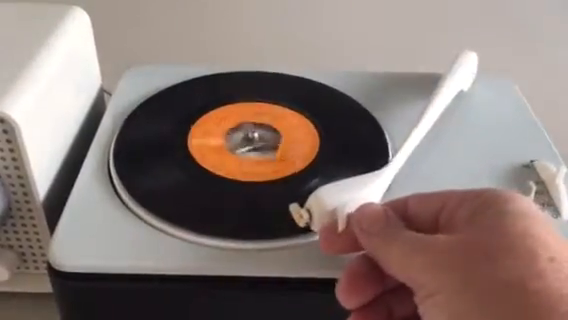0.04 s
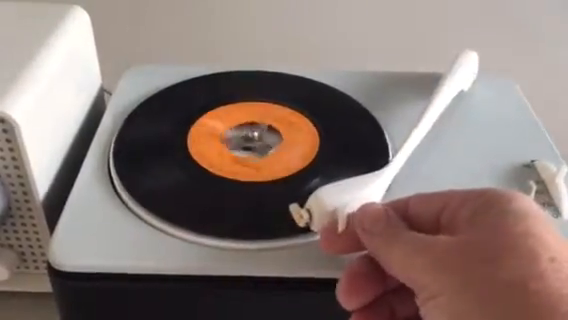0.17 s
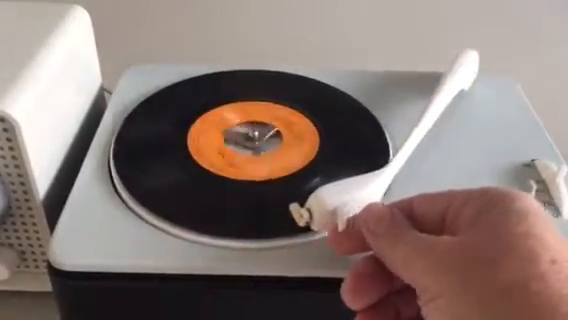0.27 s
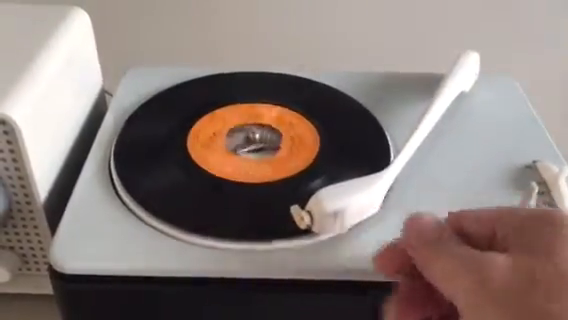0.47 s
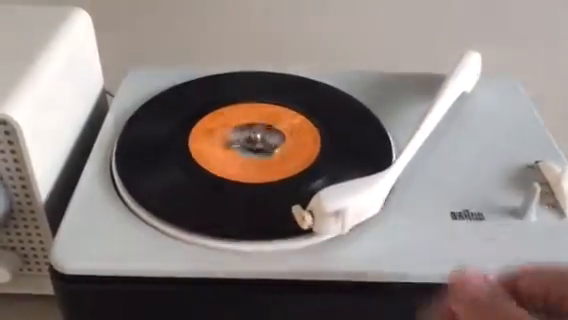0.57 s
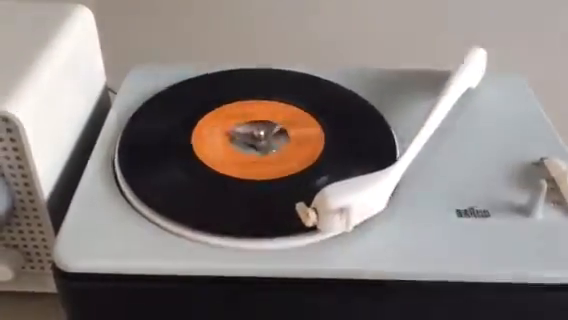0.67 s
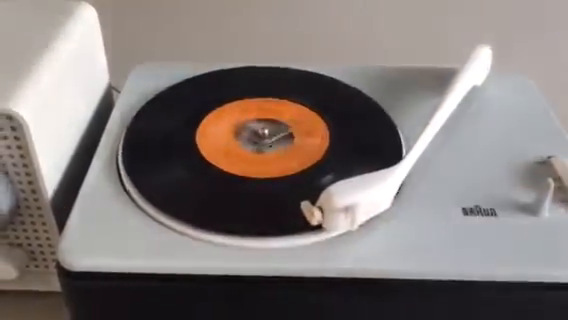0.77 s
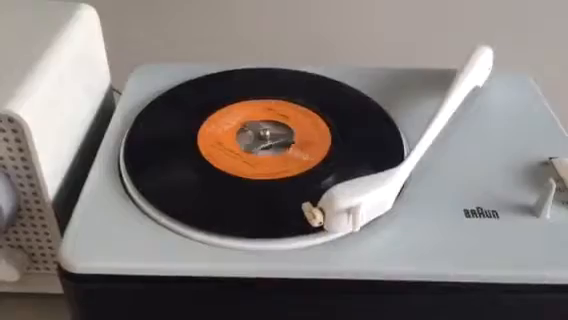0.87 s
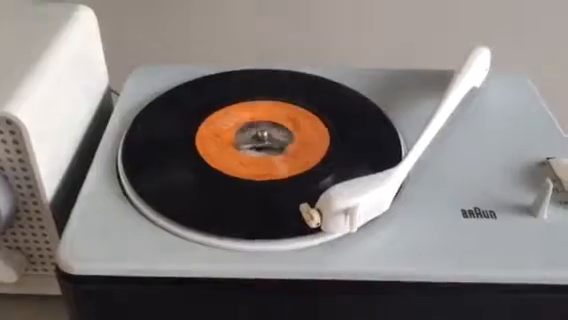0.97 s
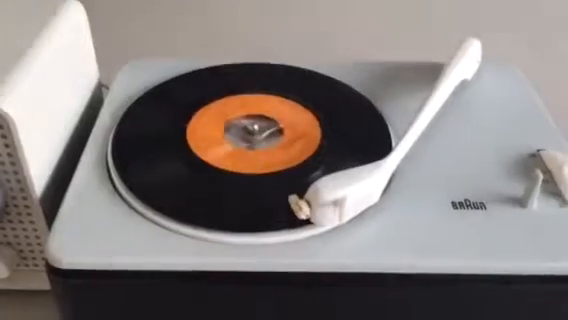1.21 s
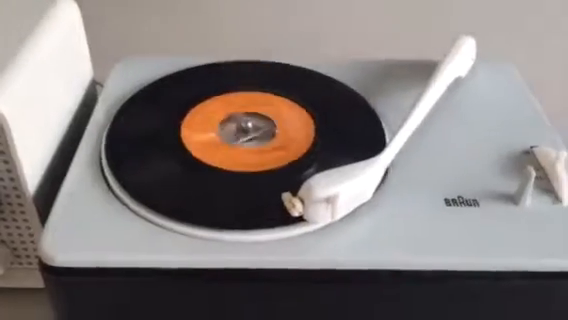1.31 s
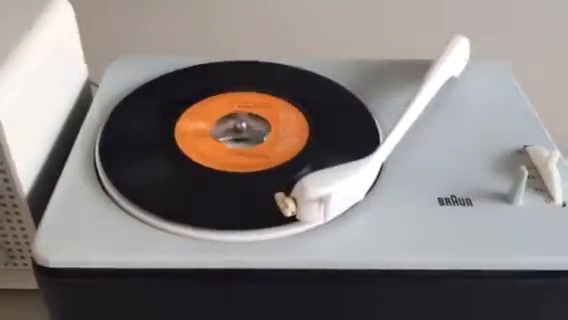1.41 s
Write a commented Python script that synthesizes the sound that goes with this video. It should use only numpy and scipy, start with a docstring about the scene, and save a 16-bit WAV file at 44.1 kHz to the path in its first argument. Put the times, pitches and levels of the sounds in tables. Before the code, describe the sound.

A stylus drops onto a record with a low thump, after light bumps and ticks from fingers lowering the arm. A sharp click follows, then faint crackle over low rumble, all from the player's small loudspeaker in a slightly echoing room.

```python
"""A stylus lands on a spinning single with a thump, then reads one sharp click and the crackle of
dust in the lead-in groove. Before it lands, the fingers lowering the tonearm rub and bump it, and
the arm conducts these vibrations to the pickup. The record player's small loudspeaker colours the
thump, clicks, crackle, bumps and rubbing; a low groove rumble sounds alongside them in a live room,
over faint noise and hum."""
import sys
import numpy as np
from scipy import signal
from scipy.fft import rfft, irfft
from scipy.io import wavfile

SR = 44100
rng = np.random.default_rng(int(sys.argv[2]) if len(sys.argv) > 2 else 0)


def output_pcm(signal):
    """Save a mono or channel-first signal as 16-bit PCM at the path in sys.argv[1].

    Samples are clipped to [-1, 1] before scaling.
    """
    pcm = np.clip(np.atleast_2d(signal).T, -1, 1) * 32767
    wavfile.write(sys.argv[1], SR, np.round(pcm).astype(np.int16))


N = 63945
TIME = np.arange(N) / SR
LANDING_S = .5073


def landing(click):
    """Impact excitation: the stylus gives a sudden, slowly relaxing push that rings a mode of the deck."""
    push = low_pass(click, hz=130, order=1)
    thump = low_pass(push, hz=2200, order=3)
    deck = resonance(thump, hz=139.8, db=8, t60=0.41)
    return place(thump + deck, LANDING_S, db=-14.5)


def groove(click):
    """Shot noise: each speck of dust deflects the stylus with one impulse, over continuous rumble."""
    # single specks: (time [s], peak level [dB], contact low-pass corner [Hz])
    specks = [(0.5098, -36.5, 5800), (0.5380, -43, 6900), (0.5469, -34.5, 6550), (0.5952, -14.5, 4300),
              (0.6543, -51, 6000), (0.674, -49, 5000), (0.7064, -44, 6100), (0.7142, -36.5, 6040),
              (0.747, -38.5, 2980), (0.771, -45.5, 3030), (.8060, -44.5, 5400), (0.9063, -51, 6030),
              (0.9127, -43.5, 5900), (0.9420, -48, 5240), (.9596, -36, 5600), (0.9597, -46, 463),
              (1.0198, -39.5, 7500), (1.052, -43.5, 5040), (1.0734, -42, 5500), (1.128, -48.5, 6100),
              (1.1448, -44.5, 6500), (1.1930, -37, 1530), (1.2123, -45, 2540), (1.2172, -46.5, 990),
              (1.2909, -53, 6940), (1.4104, -42, 7260), (1.4323, -46.5, 8200)]
    # dirty stretches of groove, Gaussian in time: (centre time [s], half-width [s], rms level [dB])
    dirty_stretches = [(0.552, 0.028, -65.5), (0.717, 0.0053, -62), (0.778, 0.063, -71), (0.911, 0.01, -64),
                       (1.03, 0.017, -67.5), (1.14, 0.014, -68), (1.217, 0.021, -70.5),
                       (1.422, 0.017, -65.5)]
    # rumble spectrum: (frequency [Hz], relative spectral level [dB])
    rumble_spectrum = [(90, -54), (140, 11.5), (230, -16), (320, 1.5), (500, -35), (1300, -42), (1800, -31),
                       (2700, -20.5), (6000, -40)]
    pops = sum(place(-high_pass(low_pass(click, corner), hz=217), s, db) for s, db, corner in specks)
    dirt = sum(from_db(db) * np.exp(-((TIME - s) / half_s) ** 2) for s, half_s, db in dirty_stretches)
    grit = through(grains(per_s=990, spread_db=0), click)
    scratches = dirt * rms_one(high_pass(grit, hz=4470, order=1))
    crackle = from_db(-77.5) * rms_one(through(grains(per_s=270, spread_db=5), click))
    rumble = from_db(-68.5) * noise(rumble_spectrum)
    return pops + scratches + (crackle + rumble) * (TIME > LANDING_S)


def handling(click):
    """Structure-borne sound: the arm carries finger impacts and friction to the pickup, losing treble."""
    # soft bumps of the hand: (time [s], peak level [dB], lower band edge [Hz], upper band edge [Hz])
    hand_bumps = [(0.1961, -35.5, 237, 574), (0.2241, -36, 126, 333), (0.239, -38, 119, 260),
                  (0.2459, -34, 114, 565), (0.261, -46, 132, 330), (.3160, -35, 467, 930),
                  (0.4190, -32.5, 314, 497), (0.421, -38.5, 760, 1230)]
    # dry ticks of the fingers: (time [s], peak level [dB])
    finger_ticks = [(0.173, -40.5), (0.1917, -32.5), (0.2314, -39), (.2575, -55), (0.2631, -38.5),
                    (0.3336, -37), (0.388, -35.5), (0.3983, -43.5), (0.442, -47), (0.453, -36),
                    (0.4564, -37.5), (0.489, -43), (0.4915, -32.5), (0.505, -25)]
    # envelope of the fingers' friction: (time [s], level [dB])
    rub_levels = [(.14, -91), (.185, -47.5), (.215, -57), (.26, -56), (.30, -63.5), (.345, -55),
                  (.375, -65.5), (.455, -54), (.478, -60.5), (.50, -53.5), (.52, -64)]
    bumps = sum(place(high_pass(low_pass(click, high, order=3), low, order=3), s, db)
                for s, db, low, high in hand_bumps)
    arm = low_pass(click, hz=3840, order=8) + from_db(-18) * click  # a little treble leaks through
    tick = low_pass(arm, hz=5800, order=1)
    ticks = sum(place(tick, s, db) for s, db in finger_ticks)
    slip = low_pass(arm, hz=3320, order=1)
    rub = rms_one(through(grains(per_s=1700, spread_db=8.5), slip))
    rub_envelope = from_db(np.interp(TIME, *np.transpose(rub_levels))) * (TIME < rub_levels[-1][0])
    return bumps + ticks + rub * rub_envelope


def speaker_click(size=16384):
    """The loudspeaker's impulse response: a minimum-phase pulse with modal ringing and dispersion."""
    # magnitude response: (frequency [Hz], gain [dB])
    response = [(70, -42), (105, -36.5), (145, -10.5), (250, -9.5), (390, -10.5), (470, -7.5), (820, -4.5),
                (1000, 0), (1180, -3.5), (1400, 4), (1510, -18), (1950, -13), (2250, -0.5), (3000, 3.5),
                (3300, -3.5), (4200, -3.5), (4480, -18.5), (4750, -8), (5150, -19), (5650, -7.5),
                (6150, -11), (7200, -9), (8250, -13), (8700, -20), (9900, -32), (15500, -31.5)]
    # cabinet and cone modes: (frequency [Hz], gain over the direct sound [dB], decay time T60 [s])
    modes = [(164, 0, 0.066), (276.6, -3.5, 0.1), (341.5, -6, 0.19), (467.5, 7.5, 0.13), (594, 1.5, 0.22),
             (926, -9.5, 0.17), (1029, -1, 0.1), (1274, -5, 0.14), (2390, 6, 0.22), (2590, -8, 0.67)]
    # registers that answer late: (frequency [Hz], added group delay [s])
    lags = [(330, 0.0021), (900, 0.00028), (2700, 0.00021), (5800, 0.00024), (7800, 0.0022)]
    gain = from_db(at_hz(response, np.arange(size // 2 + 1) * SR / size))
    cepstrum = irfft(np.log(gain))
    cepstrum[1:size // 2] *= 2  # folding onto positive time gives minimum phase
    cepstrum[size // 2 + 1:] = 0
    direct = irfft(np.exp(rfft(cepstrum)))
    click = direct + sum(resonance(direct, hz, db, t60) for hz, db, t60 in modes)
    for hz, lag_s in lags:
        allpass = poles(hz, np.exp(-2 / (lag_s * SR)))
        click = signal.lfilter(allpass[::-1], allpass, click)
    return click


def room(x):
    """Reverberation: early reflections and a diffuse tail, decaying band by band, join the direct sound."""
    # reflections from nearby surfaces: (delay [s], level [dB])
    reflections = [(.0018, -22.5), (.0032, -18.5), (.0093, -14)]
    # diffuse tail: (frequency [Hz], level [dB], reverberation time T60 [s])
    reverberation = [(144, -12.5, 0.38), (415, -8, 0.63), (600, -9.5, 1.02), (1190, -14.5, 1.1),
                     (1790, 1.5, 0.51), (2650, -17, 1.5), (6860, -7, 0.33), (9400, -4.5, 0.12),
                     (14200, -8, 0.29)]
    white = rfft(rng.standard_normal(2 * N))
    hz = np.arange(N + 1) * SR / (2 * N)
    edges_hz = np.geomspace(60, 16000, 17)
    tail = np.zeros(N)
    for low, high in zip(edges_hz, edges_hz[1:]):
        centre = np.sqrt(low * high)
        decay_rate = np.log(1000) / at_hz(reverberation, centre, column=2)
        band = irfft(white * (hz >= low) * (hz < high))[:N]
        decay = np.sqrt(2 * decay_rate / SR) * np.exp(-decay_rate * TIME)  # unit energy
        tail += band * from_db(at_hz(reverberation, centre)) * decay
    tail *= np.minimum(TIME / 0.0011, 1) ** 2  # builds up in 1.1 ms
    echoes = sum(from_db(db) * np.pad(x, (int(s * SR), 0))[:N] for s, db in reflections)
    return x + low_pass(echoes, hz=2870) + through(x, tail)


def background():
    """The noise floor: broadband room noise and a faint pure tone of mains hum."""
    # mains hum: (frequency [Hz], rms level [dB])
    hum_tones = [(200, -74.5)]
    # room noise spectrum: (frequency [Hz], relative spectral level [dB])
    room_spectrum = [(20, -57), (31, -8), (52, 3), (90, -4.5), (300, -8.5), (600, -12), (1150, -10.5),
                     (1900, -19), (2600, -23), (15500, -36)]
    hum = sum(from_db(db) * np.sqrt(2) * np.sin(2 * np.pi * (hz * TIME + rng.random()))
              for hz, db in hum_tones)
    return hum + from_db(-66) * noise(room_spectrum)


def grains(per_s, spread_db):
    """A Poisson train of impulses of random sign, their levels scattered upward by spread_db."""
    sizes = from_db(spread_db * np.minimum(rng.exponential(1, N), 3))
    return sizes * rng.choice([-1, 1], N) * (rng.random(N) < per_s / SR)


def noise(spectrum):
    """Spectral shaping: white noise takes on the given colour, at rms 1."""
    hz = np.arange(N + 1) * SR / (2 * N)
    white = rfft(rng.standard_normal(2 * N))
    return rms_one(irfft(white * from_db(at_hz(spectrum, hz)))[:N])


def resonance(x, hz, db, t60):
    """Forced vibration of one damped mode, with gain db at its peak."""
    r = np.exp(-np.log(1000) / (t60 * SR))
    return from_db(db) * signal.lfilter([1 - r, 0, r - 1], poles(hz, r), x)


def poles(hz, r):
    """Feedback coefficients of a damped oscillator with pole radius r."""
    return [1, -2 * r * np.cos(2 * np.pi * hz / SR), r * r]


def low_pass(x, hz, order=2):
    """Butterworth low-pass."""
    return signal.sosfilt(signal.butter(order, hz, fs=SR, output="sos"), x)


def high_pass(x, hz, order=2):
    """Butterworth high-pass."""
    return signal.sosfilt(signal.butter(order, hz, "high", fs=SR, output="sos"), x)


def through(x, response):
    """Convolution with an impulse response."""
    return signal.fftconvolve(x, response)[:N]


def place(pulse, s, db):
    """Delay a pulse by s seconds and scale its peak to db."""
    return np.pad(pulse, (int(s * SR), N))[:N] * from_db(db) / np.abs(pulse).max()


def at_hz(points, hz, column=1):
    """Interpolate a table column on a log-frequency axis."""
    table = np.array(points)
    return np.interp(np.log(np.maximum(hz, 1)), np.log(table[:, 0]), table[:, column])


def from_db(db):
    """Decibels to amplitude ratio."""
    return 10 ** (np.asarray(db) / 20)


def rms_one(x):
    """Normalise to rms 1."""
    return x / np.sqrt(np.mean(x ** 2) + 1e-20)


def scene():
    """Superposition: handling, landing and groove add and reverberate in the room, over the noise floor."""
    click = speaker_click()
    player = handling(click) + landing(click) + groove(click)
    return (room(player) + background())[None]


def record(dry):
    """Band limiting: a steep elliptic low-pass cuts the treble above 15.8 kHz."""
    return signal.sosfilt(signal.ellip(10, .1, 70, 15800, fs=SR, output="sos"), dry)


dry = scene()
out = record(dry)
output_pcm(out)
```